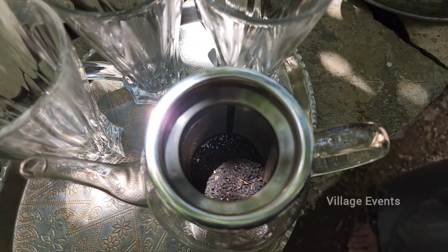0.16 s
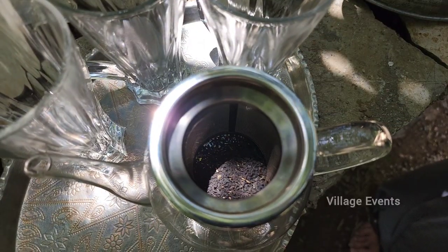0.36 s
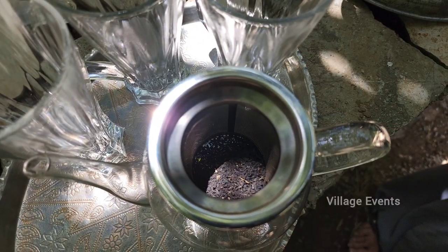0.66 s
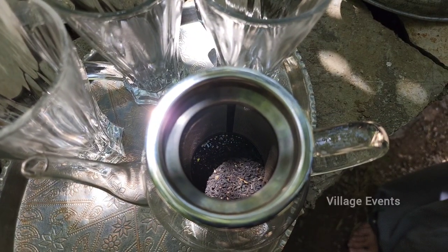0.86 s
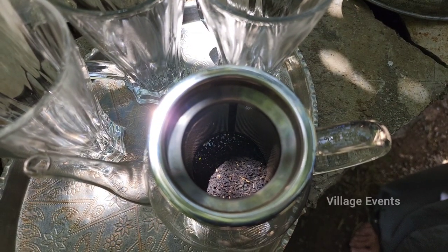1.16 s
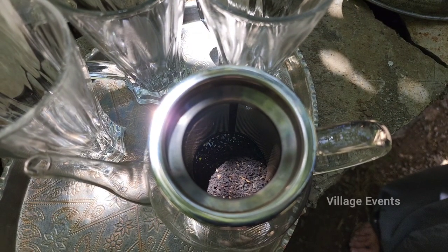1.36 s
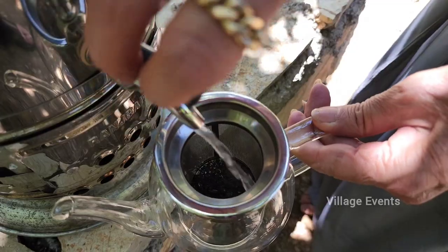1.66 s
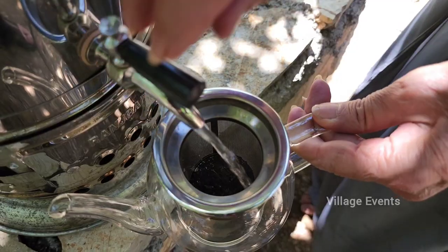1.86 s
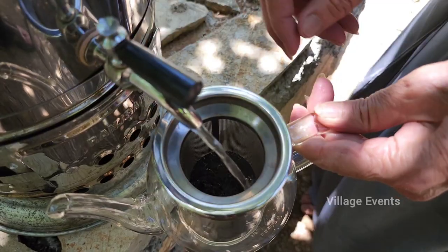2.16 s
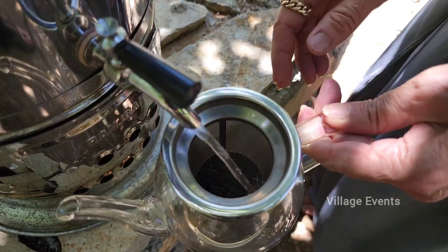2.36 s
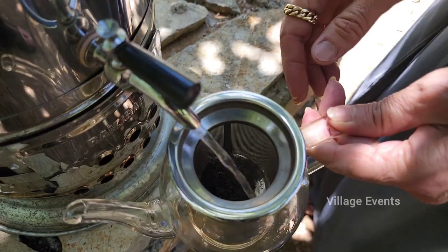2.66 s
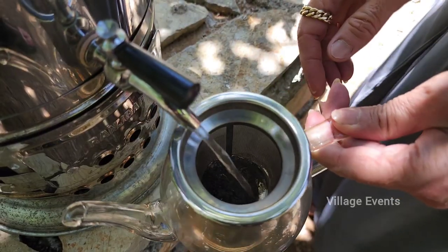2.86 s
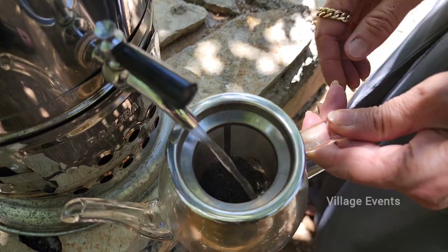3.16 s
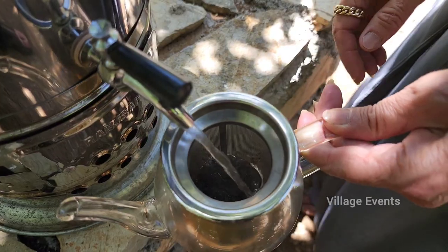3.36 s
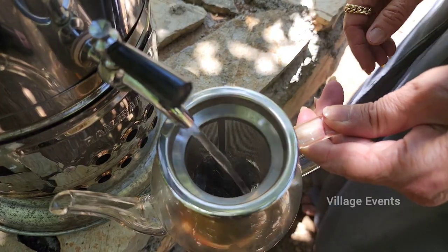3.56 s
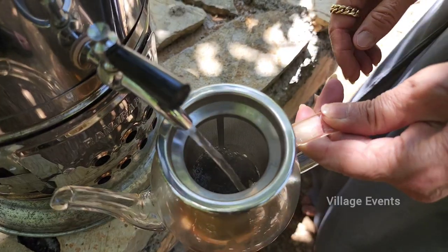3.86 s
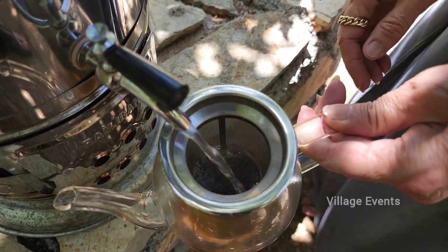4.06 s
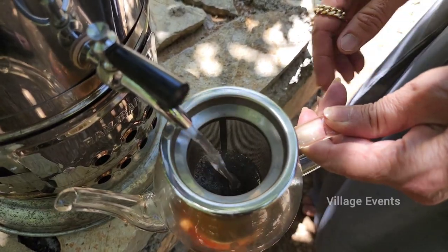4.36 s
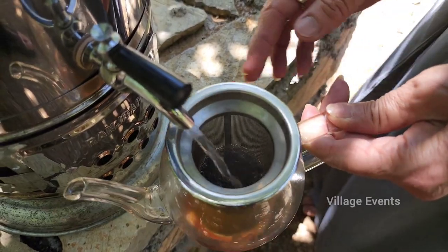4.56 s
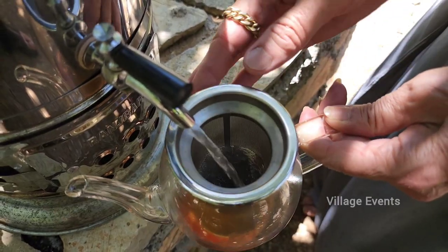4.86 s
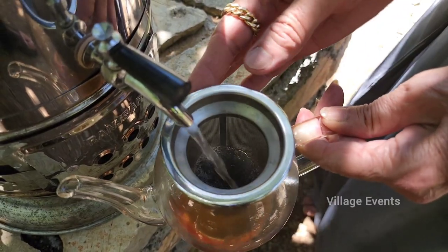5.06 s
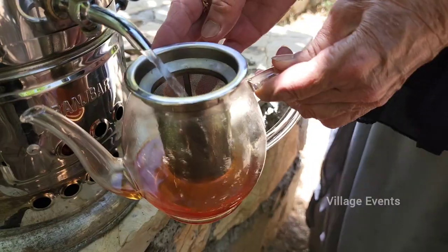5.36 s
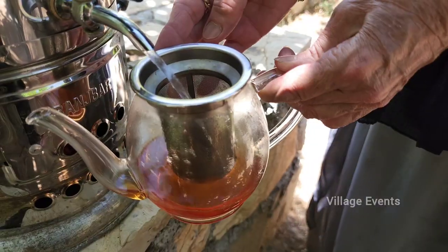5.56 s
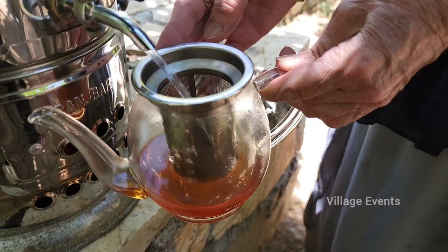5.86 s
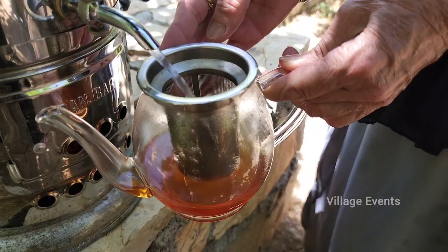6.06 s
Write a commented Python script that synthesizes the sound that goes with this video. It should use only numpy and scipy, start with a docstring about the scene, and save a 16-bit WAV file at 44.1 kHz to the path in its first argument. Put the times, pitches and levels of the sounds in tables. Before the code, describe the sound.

Glass clinks on a metal tray, then a thin stream of water gurgles into a glass teapot while cicadas buzz outdoors.

```python
"""Samovar tea under cicadas

Glassware is nudged and set down on a metal tray, and each impact excites the normal modes of both.
A thin stream of hot water then runs from a samovar tap onto the leaves in a glass teapot, where
trapped air resonates as a soft gurgle. Cicadas drive their body resonances with trains of clicks,
over open air and a distant motor. Near the end a puff of wind buffets the left microphone."""
import sys
import numpy as np
from scipy import signal
from scipy.fft import rfft, irfft, next_fast_len
from scipy.io import wavfile

SR = 44100
rng = np.random.default_rng(int(sys.argv[2]) if len(sys.argv) > 2 else 0)


def generate_wav(signal):
    """Clip the signal to [-1, 1] and save it as 16-bit WAV at the path in sys.argv[1]."""
    frames = np.transpose(np.atleast_2d(signal))
    scaled = np.clip(frames, -1, 1) * 32767
    pcm = np.round(scaled).astype(np.int16)
    wavfile.write(sys.argv[1], SR, pcm)


N = 273508
TIME = np.arange(N) / SR

# Moments of harder churning, as level changes:
# middle_s, length_s, gurgle_db, burble_db, splash_db, spray_db
STREAM_SURGES = [(2.65, 0.24, 0, 8.6, 5, 13.5), (4.286, .07, 2, 8, -3.5, 4),
                 (4.677, 0.54, 5.5, 1, -1.5, 6.9), (4.975, 0.087, 7.5, 3, -3, 12),
                 (5.43, 0.95, -2, 9, 3, 4.1)]

def pour(start_s=1.5):
    """Air entrainment: a steady jet folds bubbles into the tea and spatters, left of the listener."""
    poured_s = np.maximum(TIME - start_s, 0)
    gurgle_db, burble_db, splash_db, spray_db = sum(
        np.outer(changes_db, swell(middle_s, length_s))
        for middle_s, length_s, *changes_db in STREAM_SURGES)
    pot = gurgle(-53 + gurgle_db) + burble(-56 + burble_db, poured_s)
    strainer = spatter(-54 + splash_db, -61.5 + spray_db)
    return (TIME >= start_s) * (pan(5.5) * left_late(pot, lag_s=-0.00029) + pan(8) * strainer)


# Spectrum of the large bubbles in the pot: pitch_hz, relative_db
GURGLE_SPECTRUM = [(180, -34), (290, 4.5), (430, -13.5), (590, -2), (750, -33), (1200, -39)]

def gurgle(level_db):
    """Minnaert resonance: trapped air is a spring and water its mass, so large bubbles ring low."""
    return from_db(level_db) * bubbles(GURGLE_SPECTRUM, per_s=1400, cycles=15.4, size_db=1.5, clump_db=3)


def burble(level_db, poured_s, start_hz=514.8, climb_hz_per_s=40, fade_db_per_s=1.5, width_hz=230):
    """Cavity resonance: air pockets under the jet ring near a pitch that climbs as the pot fills."""
    pitch_hz = start_hz + climb_hz_per_s * poured_s
    shake = cut(rng.standard_normal(N) + 1j * rng.standard_normal(N), width_hz / 2, "low")
    noise_band = np.real(shake * np.exp(1j * phase_of(pitch_hz)))
    lumps = from_db(3.5 * drift(21))
    return from_db(level_db - fade_db_per_s * poured_s) * rms_one(noise_band * lumps)


# Spectrum of the splash on the leaves and steel strainer: pitch_hz, relative_db
SPLASH_SPECTRUM = [(850, -32), (1200, -3), (1400, -5), (1850, 3.5), (2300, -3), (3200, -1), (4200, -3.5),
                   (6000, -12)]
# Spectrum of the fine droplets: pitch_hz, relative_db
SPRAY_SPECTRUM = [(800, -2.5), (1500, 5), (2500, -3), (3600, 9.5), (4800, 4), (6000, 10)]

def spatter(splash_db, spray_db, echo_db=-3):
    """Small resonators ring high and briefly: splash and spray in the strainer, with reflections."""
    splash = bubbles(SPLASH_SPECTRUM, per_s=3000, cycles=16, size_db=2, clump_db=2.5)
    spray = bubbles(SPRAY_SPECTRUM, per_s=4000, cycles=6, size_db=2, clump_db=2.5)
    drops = from_db(splash_db) * splash + from_db(spray_db) * spray
    return left_late(drops, lag_s=-0.00034) + from_db(echo_db) * scatter(drops, t60=0.12)


def bubbles(spectrum, per_s, cycles, size_db, clump_db, pitch_count=24):
    """Damped oscillation: bubbles are born in random clumps, each ringing at the pitch of its size."""
    births = np.flatnonzero(rng.random(N) < per_s * from_db(clump_db * drift(14)) / SR)
    strengths = from_db(size_db * np.minimum(rng.exponential(1, len(births)), 4))
    strengths *= rng.choice([-1, 1], len(births))
    pitch_index = rng.integers(0, pitch_count, len(births))
    sound = 0
    for k, hz in enumerate(np.geomspace(spectrum[0][0], spectrum[-1][0], pitch_count)):
        clicks = np.zeros(N)
        clicks[births] = strengths * (pitch_index == k)
        sound = sound + from_db(at_hz(spectrum, hz)) * rms_one(ring(clicks, hz, t60=cycles / hz))
    return rms_one(sound)


# Impacts of glass on the tray, levels relative: start_s, clink_db, tray_db, crack_db, crack_cutoff_hz
IMPACTS = [(.234, -45, -61, -15.5, 2980), (.262, -57, -58, -21.5, 4500), (.270, -63, -60, -29, 12000),
           (0.285, -62, -60, -26, 14000), (0.293, -56, -60, -25, 14000), (0.3903, -40, -58, -16.5, 11000),
           (0.8939, -17.5, -24.5, -18.5, 4500), (1.2095, -39, -8, -0.5, 15300),
           (1.222, -51.5, -48, -30, 15000), (1.284, -33.5, -53, -22, 12000),
           (1.326, -57, -38, -17.5, 11000), (1.409, -58, -53.5, -30, 6000)]
# Modes that ring when the glass clinks, the glass's own plus one low tray tone:
# pitch_hz, relative_db, t60_s, left_over_right_db
CLINK_MODES = [(1061, -22, .1, -3), (2060, -15, .06, -3), (2225, -5, .05, -4), (2290, -3, .09, -4),
               (3050, -2.5, .075, -10), (3860, -18, .06, -8), (4280, -14, .07, -8), (5050, -14, .06, -10),
               (6260, -18, .06, -8)]
# Normal modes of the tray: pitch_hz, relative_db, t60_s, left_over_right_db
TRAY_MODES = [(608, -20, .19, 0), (1061, -27, .24, 0), (1190, -21, .07, -6), (1561, -31, .22, 0),
              (2076, -12, .12, -2), (2180, -5, .05, -3), (2318, -16, .27, -3), (3200, -14, .06, -8),
              (3810, -22, .18, -8), (4620, -14, .05, -7), (4705, -23, .18, -7), (5600, -12, .04, -9),
              (7960, -10, .05, -7), (11460, -12, .03, -10), (12620, -13, .03, -9)]

def glassware(yard_db=-14):
    """Impact excitation: glass meets metal on the right, both ring, and the yard reverberates."""
    starts_s, clink_db, tray_db, crack_db, cutoffs_hz = np.transpose(IMPACTS)
    crack = cracks(starts_s, crack_db, cutoffs_hz)
    clink = struck(CLINK_MODES, starts_s, clink_db)
    tray = struck(TRAY_MODES, starts_s, tray_db)
    direct = left_late(crack + clink + tray, lag_s=0.000432)
    return direct + from_db(yard_db) * scatter(direct, t60=0.3)


def struck(modes, starts_s, levels_db, rattle_db=3, rattle_hz=70):
    """Modal superposition: each impact rings every mode, and a loose seat makes each ring flutter."""
    clicks = np.zeros(N)
    clicks[np.round(starts_s * SR).astype(int)] = from_db(levels_db)
    sound = 0
    for k, (hz, level_db, t60, side_db) in enumerate(modes):
        gain = from_db(level_db + rattle_db * drift(rattle_hz))
        sound = sound + (-1) ** k * gain * pan(side_db) * ring(clicks, hz, t60)
    return sound


# Spectrum of the sharp crack of a hard contact, as the microphone colours it: frequency_hz, relative_db
CRACK_SPECTRUM = [(100, -17), (250, 5), (900, -3.5), (1500, -9.5), (2100, 7.5), (2650, -3), (3100, 8),
                  (4600, 3), (6000, 0.5), (8000, 6), (10200, -6), (11600, 4), (13800, 4), (14600, 4),
                  (15400, 5)]

def cracks(starts_s, levels_db, cutoffs_hz, crack_t60=0.018, buzz_db=-20, buzz_t60=0.09):
    """Impact transient: a hard contact gives a broadband crack followed by a short buzz."""
    grit = from_db(-5) * pan(-8) * noise(CRACK_SPECTRUM)
    sound = 0
    for start_s, level_db, cutoff_hz in zip(starts_s, levels_db, cutoffs_hz):
        age = TIME - start_s
        envelope = dying(age, crack_t60) + from_db(buzz_db) * dying(age, buzz_t60)
        sound = sound + cut(from_db(level_db) * envelope * grit, cutoff_hz, "low")
    return sound


# Dull knocks, drips and big bubbles: start_s, level_db, pitch_hz, t60_s, left_over_right_db
PLOP_EVENTS = [(.262, -32, 693, 0.05, -16), (.263, -20, 467, 0.019, 2), (1.302, -29.5, 301, 0.17, -3.5),
               (1.303, -38, 480, 0.052, -19), (1.329, -28, 520, 0.041, -5), (1.489, -30, 275, 0.042, 7.5),
               (3.843, -37, 1960, 0.032, 11), (4.28, -41.5, 314, 0.081, 8), (4.540, -26, 640, 0.02, 7),
               (4.665, -28, 619, 0.029, 4), (5.24, -41.5, 802, 0.034, 11), (5.291, -33, 710, 0.02, 4),
               (5.356, -35, 690, 0.027, 9), (5.455, -42, 755, 0.024, 4.5), (5.526, -34, 732, 0.037, 9),
               (5.625, -43, 700, .03, 7)]

def plops(roughness=0.6, shake_hz=220, attack_s=0.0012):
    """Heavy damping: each knock or drip is one quickly dying mode, roughened by random modulation."""
    shake = rms_one(cut(rng.standard_normal(N), shake_hz, "low"))
    sound = 0
    for start_s, level_db, hz, t60, side_db in PLOP_EVENTS:
        age = np.maximum(TIME - start_s, 0)
        envelope = (1 - np.exp(-age / attack_s)) * dying(age, t60)
        phase = 2 * np.pi * hz * age
        tone = np.sin(phase) + roughness * shake * np.cos(phase)
        sound = sound + pan(side_db) * from_db(level_db) * envelope * tone
    return sound


# Light rubs as the things are handled: middle_s, length_s, level_db
RUBS = [(0.28, .08, -36), (1.065, .05, -41), (1.698, 0.088, -46), (2.58, 0.37, -50), (4.63, .12, -50)]

def rubbing(edge_hz=10500, grain_db=4):
    """Sliding friction: light rubbing gives a thin, grainy hiss."""
    hiss = cut(rng.standard_normal((2, N)), edge_hz, "high", order=4)
    grain = from_db(grain_db * drift(90))
    return swells(RUBS) * pan(-5) * rms_one(hiss * grain)


# Body resonances, one cicada to a row: pitch_hz, bandwidth_hz, relative_db
CICADA_RESONANCES = [(6690, 880, -4.5), (6930, 400, -3), (7120, 300, -6), (7640, 450, -5.5),
                     (7970, 230, -2), (8250, 440, 0.5), (8720, 540, -8), (8880, 290, -5.5),
                     (9700, 860, -13.5)]

def cicadas(tymbal_hz=219.4, rate_spread=0.06, jitter=0.02, throb_db=1, swell_db=-0.68):
    """Pulsed resonance: buckling tymbals drive each insect's body, and the trees blur the pulses."""
    chorus = 0
    for hz, width_hz, level_db in CICADA_RESONANCES:
        click_hz = tymbal_hz * (1 + rate_spread * rng.uniform(-1, 1) + jitter * drift(25))
        clicks = np.diff(np.floor(np.cumsum(click_hz) / SR), prepend=0)
        clicks *= from_db(2.35 * rng.standard_normal(N))  # uneven in strength
        body = ring(clicks, hz, t60=np.log(1000) / (np.pi * width_hz))
        song = cut(body, [0.89 * hz, 1.17 * hz], "band")
        blurred = np.array([rms_one(side) for side in scatter(song, t60=0.077)])
        chorus = chorus + from_db(level_db + throb_db * drift(6.8)) * blurred
    return from_db(swell_db * drift(2.9)) * rms_one(chorus)


# Spectrum of the fizz around the cicadas' song: frequency_hz, relative_db
FIZZ_SPECTRUM = [(2500, -8.5), (3500, -16), (5000, -17), (6500, 3.5), (9500, 7.5), (10600, 0), (12600, 3),
                 (14000, -2), (16000, 0)]

def fizz():
    """Incoherent noise: a treble fizz, independent on the two sides, surrounds the song."""
    return noise(FIZZ_SPECTRUM)


# Puffs of wind: middle_s, length_s, level_db
WIND_PUFFS = [(5.2, 0.035, -41), (5.393, .092, -23), (5.46, 0.05, -36)]

def wind(breeze_db, buffet_hz=54, unsteadiness=0.186, rumble_db=-8, right_db=-15):
    """Turbulence: eddies buffet the left microphone at an uneven rate, over a low rumble."""
    force = from_db(breeze_db + 3 * drift(6.5)) + swells(WIND_PUFFS)
    eddies = np.sqrt(2) * np.sin(phase_of(buffet_hz * (1 + unsteadiness * drift(38.4))))
    rumble = rms_one(cut(rng.standard_normal((2, N)), [20, 70], "band"))
    return force * (eddies + from_db(rumble_db) * rumble) * from_db([[0], [right_db]])


# Spectrum of open air and leaves: frequency_hz, relative_db
AIR_SPECTRUM = [(20, -51), (60, -3), (105, -6), (155, -0.5), (200, -10), (300, 0.5), (400, -4.5),
                (520, -13.5), (850, -14.5), (1400, -12), (2000, -8.5), (3000, -13.5), (5000, -14),
                (16000, -23.5)]
# Likeness of its left and right sides: frequency_hz, correlation
AIR_COHERENCE = [(40, 1), (300, 0.8), (700, 0.22), (1500, 0), (16000, 0)]

def open_air(level_db, waver_db=0.5):
    """Diffuse field: the noise of air and leaves is alike on both sides only at long wavelengths."""
    gain = from_db(level_db + waver_db * drift(11))
    return gain * left_late(noise(AIR_SPECTRUM, AIR_COHERENCE), lag_s=0.00005)


# Tones of a distant motor: pitch_hz, level_db
MOTOR_TONES = [(99, -54.5), (130, -62), (151, -58)]

def motor(waver=0.0255, throb_db=2.5):
    """Propagation outdoors: a motor's low tones waver in level and pitch on their way through the air."""
    hum = 0
    for hz, level_db in MOTOR_TONES:
        gain = from_db(level_db + throb_db * drift(1.5))
        hum = hum + gain * np.sin(phase_of(hz * (1 + waver * drift(8.7))))
    return pan(3.5) * hum


# The background at three listening places: start_s, air_db, song_db, song_left_over_right_db,
# fizz_db, fizz_left_over_right_db, motor_gain_db, breeze_db
LISTENING_PLACES = [(0, -44.5, -36.5, 0.5, -40.5, -4, -3, -75),
                    (1.497, -47.8, -40, 0.3, -45.5, 0.5, -1.5, -73),
                    (5.156, -50, -40, 3, -45.5, 1, 3, -55.5)]

def background_levels():
    """Level depends on position: each listening place holds its own balance until the next begins."""
    starts_s, *columns = np.transpose(LISTENING_PLACES)
    place = np.searchsorted(starts_s[1:], TIME)
    return [column[place] for column in columns]


def dips(depth_db=-7.5, recovery_s=0.02):
    """Amplitude modulation: the level drops at each change of place and comes straight back."""
    depth = sum((TIME >= start_s) * np.clip(1 - (TIME - start_s) / recovery_s, 0, 1)
                for start_s, *_ in LISTENING_PLACES[1:])
    return from_db(depth_db * depth)


def from_db(db):
    """Amplitude ratio of a level in decibels."""
    return 10 ** (np.asarray(db) / 20)


def rms_one(x):
    """Normalisation to unit power."""
    return x / np.sqrt(np.mean(x ** 2) + 1e-20)


def at_hz(points, hz):
    """Interpolation on a log-frequency axis."""
    points_hz, values = np.transpose(points)
    return np.interp(np.log(hz + 1e-9), np.log(points_hz), values)


def phase_of(hz):
    """Phase is the running integral of frequency."""
    return 2 * np.pi * np.cumsum(hz) / SR


def pan(left_over_right_db):
    """Level difference as a cue to direction: left and right gains."""
    return from_db(np.array([[.5], [-.5]]) * left_over_right_db)


def left_late(x, lag_s):
    """Path difference: sound from the right reaches the left later; a negative lag, earlier."""
    left, right = np.broadcast_to(x, (2, N))
    return np.array([np.interp(TIME - lag_s, TIME, left), right])


def drift(rate_hz):
    """Slow random fluctuation: low-passed noise of unit power."""
    step, settle = 40, 2000
    pole = np.exp(-2 * np.pi * rate_hz * step / SR)
    white = rng.standard_normal(N // step + settle + 2)
    slow = signal.lfilter([1], [1, -2 * pole, pole * pole], white)[settle:]
    return np.interp(np.arange(N) / step, np.arange(len(slow)), rms_one(slow))


def noise(spectrum, coherence=None):
    """Spectral shaping: stereo noise of unit power with a given colour and left-right correlation."""
    size = next_fast_len(N)
    hz = np.fft.rfftfreq(size, 1 / SR)
    alike = 0 if coherence is None else np.clip(at_hz(coherence, hz), -1, 1)
    mid, side = rfft(rng.standard_normal((2, size)))
    stereo = np.sqrt(1 + alike) * mid + np.sqrt(1 - alike) * side * [[1], [-1]]
    return rms_one(irfft(stereo * from_db(at_hz(spectrum, hz)), size)[:, :N])


def ring(clicks, hz, t60):
    """Damped resonator: a unit click starts a decaying sine of height 1."""
    decay, angle = np.exp(-np.log(1000) / (t60 * SR)), 2 * np.pi * hz / SR
    return signal.lfilter([0, np.sin(angle)], [1, -2 * decay * np.cos(angle), decay ** 2], clicks + 1e-18)


def cut(x, hz, kind, order=2):
    """Maximally flat filter."""
    return signal.sosfilt(signal.butter(order, hz, kind, fs=SR, output="sos"), x + 1e-18)


def dying(age, t60):
    """Exponential decay from age 0, falling 60 dB in t60 seconds."""
    return (age >= 0) * np.exp(-np.log(1000) * np.clip(age / t60, 0, 10))


def swell(middle_s, length_s):
    """Raised cosine: a smooth rise from 0 to 1 and back."""
    return np.cos(np.pi * np.clip((TIME - middle_s) / length_s, -.5, .5)) ** 2


def swells(events):
    """Superposed swells, each at its own level."""
    return sum(from_db(level_db) * swell(middle_s, length_s) for middle_s, length_s, level_db in events)


def scatter(x, t60):
    """Diffuse reflection: many small echoes off stone and trees, different on each side."""
    age = TIME[:SR // 2]
    echoes = rng.standard_normal((2, len(age))) * dying(age, t60)
    echoes /= np.sqrt(np.sum(echoes ** 2, axis=1, keepdims=True))
    return signal.fftconvolve(np.atleast_2d(x), echoes, axes=1)[:, :N]


def scene():
    """Linear superposition: the tea things, the insects and the open air add as pressures."""
    air_db, song_db, song_side_db, fizz_db, fizz_side_db, motor_gain_db, breeze_db = background_levels()
    outdoors = open_air(air_db) + from_db(motor_gain_db) * motor()
    outdoors += from_db(song_db) * pan(song_side_db) * cicadas()
    outdoors += from_db(fizz_db) * pan(fizz_side_db) * fizz()
    return (pour() + glassware() + plops() + wind(breeze_db) + rubbing() + outdoors) * dips()


def record(dry, cutoff_hz=15800):
    """Clipping and band limiting: peaks stop at full scale, then a steep low-pass cuts the top."""
    low_pass = signal.ellip(10, .2, 80, cutoff_hz, fs=SR, output="sos")
    return signal.sosfilt(low_pass, np.clip(dry, -1, 1))


dry = scene()
out = record(dry)
generate_wav(out)
```